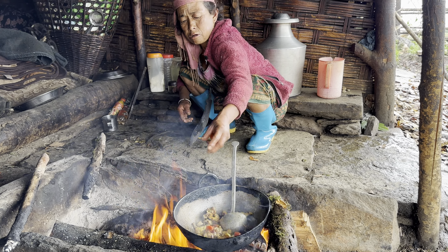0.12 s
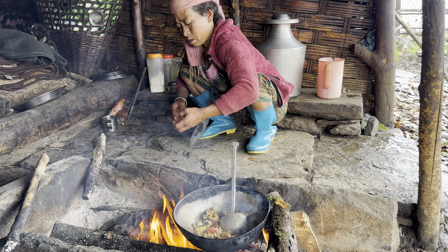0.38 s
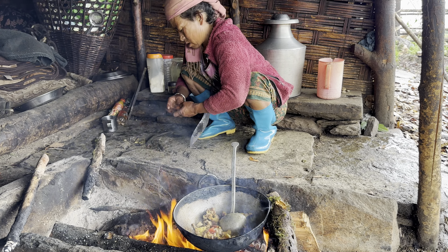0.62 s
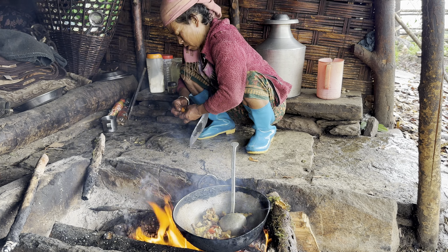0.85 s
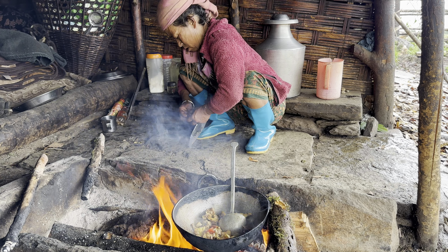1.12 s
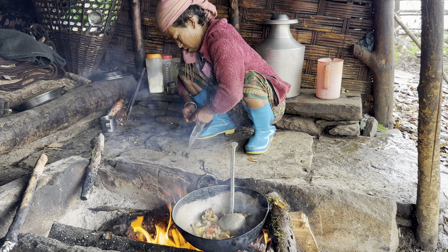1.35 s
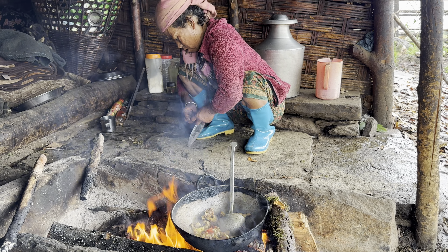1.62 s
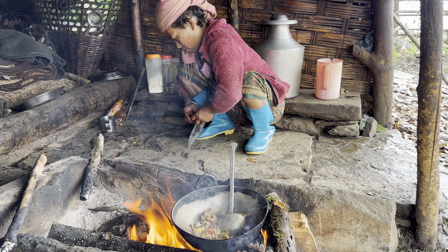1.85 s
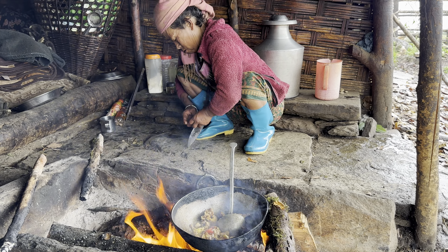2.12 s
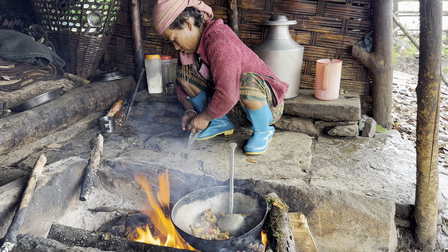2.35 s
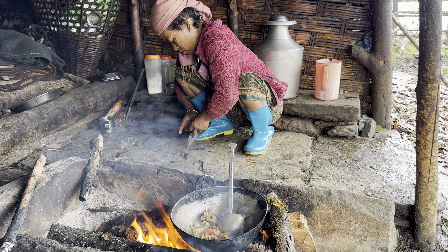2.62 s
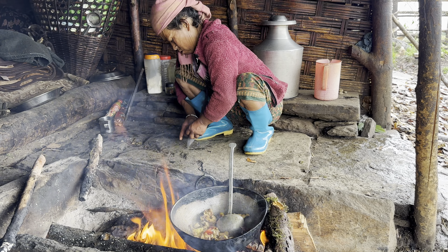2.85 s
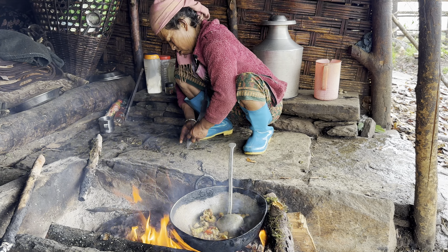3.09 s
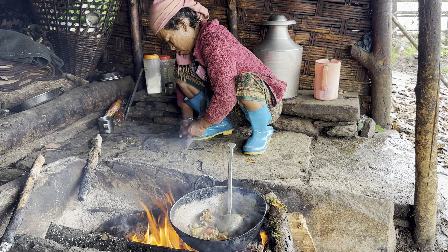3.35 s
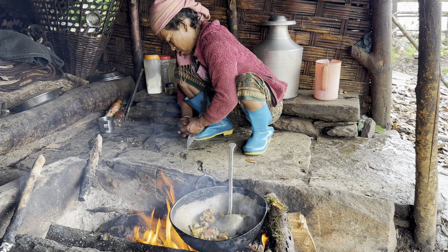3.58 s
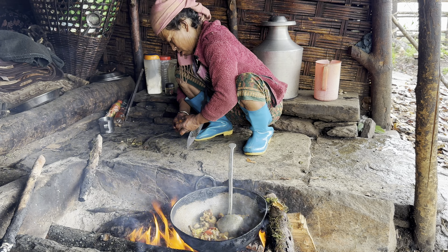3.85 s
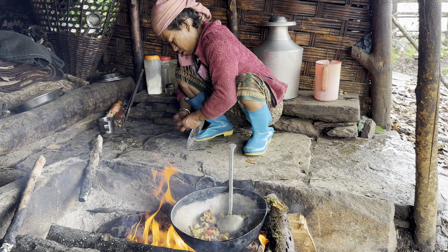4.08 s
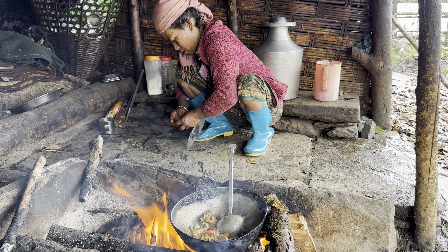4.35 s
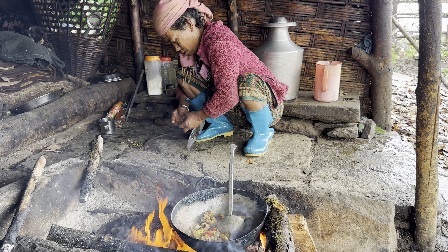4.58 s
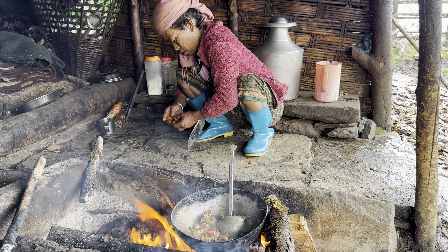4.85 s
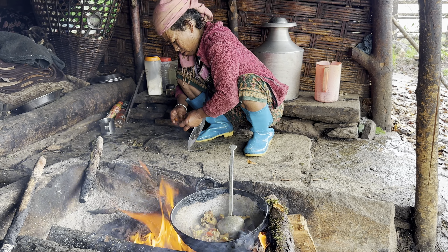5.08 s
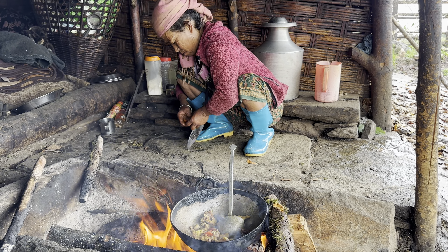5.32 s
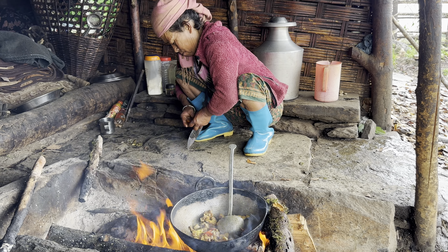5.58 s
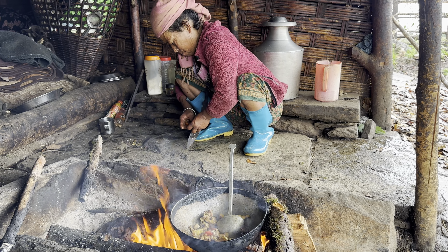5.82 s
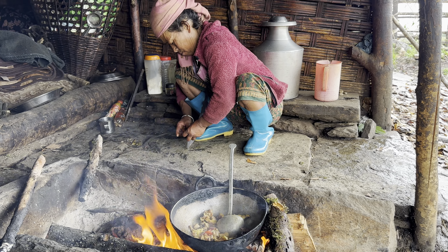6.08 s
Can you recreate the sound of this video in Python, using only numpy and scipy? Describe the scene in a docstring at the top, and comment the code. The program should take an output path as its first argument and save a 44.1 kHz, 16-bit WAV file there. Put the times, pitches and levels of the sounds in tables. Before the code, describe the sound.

Throughout about 6.2 seconds, meat sizzles close by in a metal pan over a wood fire: a dense, bright, finely flickering hiss with a slight metallic colour. Small fat spits tick at 0.1, 0.3, 0.6 and 0.9 seconds; a sharp snap of fat and wood comes at 1.07. Chicks in the yard start short falling peeps at 1.35 and continue, often in pairs, until about 6.1. The hen gives a soft rough cluck at 2.0, as the low flame flutter grows. Wood cracks at 2.15, then loudest, with a hollow knock, at 2.6, trailing small crackles to 3.1. Frying is stronger from 2.9 to 3.7, with many spits, notably at 3.5. More clucks come at 3.3, 4.1, 4.55, 4.9, 5.2, 5.6 and 6.0. Faint low wind puffs touch the microphone around 2.2 and 3.6. The open shelter adds only brief dull reflections.

```python
"""Frying over a wood fire

Meat fries in a metal pan over a wood fire under an open shelter. Sizzling fat is made of random tiny
clicks shaped by the pan, spitting drops are short rings, and each wood pop sets a row of tones ringing.
In the yard a hen clucks (rough pulses through mouth resonances) and her chicks peep (falling whistles).
Puffs of wind, made of low noise, touch the two microphone ports."""
import sys
import numpy as np
from scipy import signal
from scipy.fft import rfft, irfft
from scipy.io import wavfile
from scipy.ndimage import uniform_filter1d, map_coordinates

SR = 44100
rng = np.random.default_rng(int(sys.argv[2]) if len(sys.argv) > 2 else 0)


def store_wav(level_fs):
    """Save 16-bit WAV to argv[1]."""
    pcm = np.round(np.clip(np.atleast_2d(level_fs), -1, 1) * 32767)
    wavfile.write(sys.argv[1], SR, pcm.T.astype(np.int16))


def invert_db(x):
    """Field ratio 10**(x/20) for x, a level in decibels (scalar or array-like)."""
    u = np.asarray(x, float) / 20
    return 10 ** u


N = 273411  # length of the scene in samples


def slow_chance(rate):
    """Smoothly wandering noise of spread near 1, with a new random knot rate times a second."""
    knots = rng.standard_normal(int(N / SR * rate) + 3)
    return map_coordinates(knots, [np.arange(N) / SR * rate], order=3)


def in_time(rows):
    """Columns of a table joined by straight lines, one value a sample."""
    s, *columns = np.transpose(rows)
    return [np.interp(np.arange(N) / SR, s, c) for c in columns]


def in_pitch(rows, hz):
    """Columns of a table joined on a log-frequency axis."""
    at, *columns = np.transpose(rows)
    return [np.interp(np.log(hz + 1), np.log(at), c) for c in columns]


def at_ports(x, left_db, right_db, lead):
    """One spectrum as each port receives it; the left leads the right by lead radians."""
    return np.array([x * invert_db(left_db) * np.exp(.5j * lead), x * invert_db(right_db) * np.exp(-.5j * lead)])


def peak_db_at(t, rise, fall, crown_s):
    """A rounded peak of 0 dB at t = 0, rising and falling in dB per second."""
    return -np.where(t < 0, rise, fall) * (np.hypot(t, crown_s) - abs(crown_s))


def resonance(x, hz, width_hz):
    """A hollow space favours one band of sound, with gain 1 at its top."""
    r = np.exp(-np.pi * width_hz / SR)
    top = np.array([1, 0, -1]) * (1 - r * r) / 2
    return signal.lfilter(top, [1, -2 * r * np.cos(2 * np.pi * hz / SR), r * r], x)


def ring(clicks, hz, t60):
    """A unit click sets a sine of height 1 ringing; it falls by 60 dB in t60 seconds."""
    r, w = invert_db(-60 / (t60 * SR)), 2 * np.pi * hz / SR
    return signal.lfilter([0, np.sin(w)], [1, -2 * r * np.cos(w), r * r], clicks + 1e-18)


# puffs of wind, before the lumps: peak t/s, peak level/dB
WIND_PUFFS = [(0.62, -66), (1.075, -67), (1.42, -66), (2.21, -48), (2.3, -50), (2.43, -57), (2.5, -58),
              (2.64, -55), (3.26, -62), (3.59, -51), (3.65, -60), (3.75, -67), (4.14, -64), (4.38, -69),
              (4.58, -73), (4.85, -74), (5.82, -72), (5.97, -70)]


def wind(lumpy_db, own_share, lead):
    """Lumpy low turbulence, mostly common to both ports: a wavering breeze and separate puffs."""
    common, left, right = rng.standard_normal((3, N))
    raw = irfft(at_ports(rfft(common), .7, -.7, lead), N) + own_share * np.array([left, right])
    low = signal.sosfilt(signal.butter(2, [45, 130], "band", fs=SR, output="sos"), raw)
    t = np.arange(N) / SR
    breeze_db, breeze_swing_db = -84.5, 1
    rise_db_per_s, fall_db_per_s = 384, 350
    strength = invert_db(breeze_db + breeze_swing_db * slow_chance(12.0))
    for s, db in WIND_PUFFS:
        strength += invert_db(db + peak_db_at(t - s, rise_db_per_s, fall_db_per_s, crown_s=0.0036))
    lumps = invert_db(lumpy_db * slow_chance(30.04))
    return strength * lumps * low / low.std()


# chicks' calls, level at the right port before wavering and bounce:
# t/s, length/s, start f/Hz, end f/Hz, peak level/dB
CHICK_PEEPS = [(1.346, 0.038, 3500, 2500, -30), (1.452, 0.03, 3260, 2570, -31),
               (1.667, 0.049, 4400, 2400, -30), (1.796, 0.044, 3460, 2400, -32.5),
               (2.417, 0.045, 3400, 2330, -33), (2.762, 0.029, 4000, 2750, -34),
               (2.805, .053, 3470, 2360, -31), (3.145, 0.046, 3850, 2460, -32.5),
               (3.188, 0.049, 3340, 2400, -30.5), (3.6, 0.035, 3450, 2470, -35),
               (3.69, 0.069, 3580, 2250, -35.5), (4.021, 0.065, 3310, 2400, -30),
               (4.083, .037, 3650, 2620, -34), (4.432, 0.043, 3950, 2600, -31),
               (4.482, 0.066, 3460, 2250, -32.5), (4.862, 0.067, 4410, 2450, -34),
               (4.966, 0.069, 3440, 2250, -38), (5.087, 0.044, 4400, 3500, -36.5),
               (5.265, 0.023, 4100, 3600, -35), (5.517, 0.034, 3950, 3020, -34),
               (6.138, 0.046, 4050, 2790, -35)]


def chicks(lag_s):
    """Falling whistles that swell and break off, a little earlier on the left, wavering in strength."""
    out = np.zeros((2, N))
    drop_hz_per_s = 62000  # the slope at the end, or steeper if a straight fall is steeper
    left_over_right_db = -5
    for s, length, start_hz, end_hz, peak_db in CHICK_PEEPS:
        fall_hz = start_hz - end_hz
        late = max(1, drop_hz_per_s * length / fall_hz)  # long calls linger high first
        u = np.linspace(0, 1, round(length * SR))
        pitch = start_hz - fall_hz * u ** late
        swell = signal.windows.tukey(len(u), .2) * (.3 + .7 * u ** 1.5)
        cycles = np.cumsum(pitch) / SR - np.outer([lag_s, 0], pitch)
        level = invert_db(peak_db + np.array([[left_over_right_db], [0]]))
        out[:, round(s * SR):][:, :len(u)] += level * swell * np.sin(2 * np.pi * cycles)
    out *= invert_db(3.5 * slow_chance(150))
    # a strong bounce off the hard ground breaks each glide into strokes
    left_bounce = np.roll(out[0], round(0.001602 * SR))
    right_bounce = np.roll(out[1], round(.0011 * SR))
    return out + invert_db(-8.5) * np.array([left_bounce, right_bounce])


# clucks, before the two ports: peak t/s, peak level/dB, time from soft first catch to peak/s,
# f/Hz at full effort, beak opening at the peak as level/dB of the open over the shut resonance
HEN_CLUCKS = [(1.978, -33.5, 0.038, 428.7, 8), (3.264, -33.5, .038, 295.2, 5), (4.123, -33.5, .028, 446, 5),
              (4.554, -31.5, 0.042, 436.7, 6), (4.879, -31, 0.043, 429, 12), (5.214, -31.5, .04, 434, 17),
              (5.575, -35, 0.037, 446, 6.5), (5.986, -37.5, .024, 300, -14), (6.007, -36.5, .02, 436, -3)]
# the hen, off to one side, reaches the ports nearly in opposition:
# f/Hz, left level/dB, right level/dB, left lead/rad
HEN_AT_PORTS = [(179, 0, -2, 1.2), (300, 4, -7, 1.3), (415, 2.5, -0.5, 2.94), (570, 5.5, -1.5, 0.97),
                (850, 4.5, -0.5, 2.47), (1010, 2, -1, 2.8), (1480, -7.5, -8, 2.6)]


def hen(jitter, uneven_db, rasp, width_hz):
    """Uneven pulses with a rasp of air in every cycle; the beak trades one mouth resonance for another."""
    out, wobble = np.zeros(N), slow_chance(150)
    air, sizes = rng.standard_normal(N), invert_db(uneven_db * rng.standard_normal(N))
    catch_db, catch_s, catch_open_db = -8.5, .012, 3  # soft first catch: below the peak, spread, beak
    swell_db_per_s, fade_db_per_s, crown_s = 649, 518.5, .005  # main stroke: rise, fall, rounded top
    reach = round(.1 * SR)
    t = np.arange(-reach, reach) / SR
    for s, peak_db, lead_s, pitch_hz, beak_db in HEN_CLUCKS:
        span = slice(round(s * SR) - reach, round(s * SR) + reach)
        stroke = invert_db(peak_db_at(t, swell_db_per_s, fade_db_per_s, crown_s))
        effort = stroke + invert_db(catch_db) * np.exp(-.5 * ((t + lead_s) / catch_s) ** 2)
        # pitch sags by about a quarter for each dB of less effort
        effort_db = 20 * np.log10(np.maximum(effort, .05))
        pitch = pitch_hz * np.exp(0.25 * effort_db)
        open_db = catch_open_db + (beak_db - catch_open_db) * stroke
        rough = 1 - .75 * stroke  # the voice clears towards the peak
        cycles = np.cumsum(pitch * (1 + jitter * rough * wobble[span])) / SR
        phase = cycles % 1
        starts = np.diff(phase, prepend=0) < 0
        weaker = invert_db(-5 * (cycles // 1 % 2))  # every second pulse is 5 dB weaker
        pulses = starts * sizes[span] ** rough * weaker
        pulses += rasp * rough * air[span] * np.exp(-3 * phase) / 10
        throat = 0.63 * resonance(pulses, 418, 168)
        shut = invert_db(-open_db / 2) * resonance(pulses, 602, width_hz)
        opened = invert_db(open_db / 2) * resonance(pulses, 885, width_hz)
        top = 0.53 * resonance(pulses, 1320, 290)
        voice = throat - shut + opened - top
        even = np.sqrt(uniform_filter1d(voice ** 2, 600) + 1e-9)  # effort, not chance, sets the loudness
        out[span] += invert_db(peak_db) * effort * voice / even
    hz = np.fft.rfftfreq(N, 1 / SR)
    return irfft(at_ports(rfft(out), *in_pitch(HEN_AT_PORTS, hz)), N)


# wood popping, strength before each tone's own level and chance:
# t/s, hollow body under 700 Hz level/dB, crack level/dB, snap over 2.5 kHz level/dB
WOOD_POPS = [(0.262, -66, -44, -33.5), (0.8925, -63, -36.5, -33), (1.039, -63, -47, -33),
             (1.0667, -46, -34, -31), (1.0709, -47, -34, -28), (2.1544, -36.5, -32, -47),
             (2.5982, -25, -24.5, -30.5), (2.6055, -41, -24, -40), (2.6107, -42, -33, -42),
             (2.6135, -52, -34, -42), (2.678, -43, -44, -47), (2.807, -48, -42, -44),
             (2.833, -46, -35, -40), (3.065, -58, -38, -34), (3.66, -36, -35.5, -40),
             (4.124, -45, -37, -35), (5.934, -54, -52, -37)]
# tones of the wood: f/Hz, level/dB added to the strength of the pop, time to fall by 60 dB/s
WOOD_TONES = [(144, -16, 0.039), (458, 2, 0.033), (625, -2.5, 0.024), (814, -4, 0.023), (1290, -4.5, 0.017),
              (1755, -6, 0.039), (2210, -2.5, 0.019), (2950, -2.5, 0.027), (3500, -3, 0.009),
              (4050, 3.5, 0.011)]


def fire(rustle_db, rustle_t60):
    """Each pop strikes every tone of the wood with a strength of its own at each port."""
    s, *strength_db = np.transpose(WOOD_POPS)
    at = (s * SR).astype(int)
    chance_db = rng.normal(0, 1.8, (len(s), 2 * len(WOOD_TONES)))
    out = np.zeros((2, N))
    for k, (hz, level_db, t60) in enumerate(WOOD_TONES):
        part = np.searchsorted([700, 2500], hz)  # body, crack or snap
        for side in (0, 1):
            clicks = np.zeros(N)
            clicks[at] = invert_db(strength_db[part] + level_db + chance_db[:, 2 * k + side])
            out[side] += ring(clicks, hz, t60) * (-1) ** k
    # splinters tear on after the crack: a rustle that dies away
    strikes = np.zeros(N)
    strikes[at] = invert_db(strength_db[1] + rustle_db)
    dying = signal.lfilter([1], [1, -invert_db(-60 / (rustle_t60 * SR))], strikes + 1e-18)
    band = signal.butter(1, [900, 3500], "band", fs=SR, output="sos")
    return out + signal.sosfilt(band, dying * rng.standard_normal((2, N)))


def shelter(x):
    """Wall and ground send back a few dull echoes; each port hears those of the other port's sound."""
    dull = signal.lfilter([.5], [1, -.5], x)
    echoes = [(.0047, -15.5), (.0104, -17.5), (.0168, -24)]  # t/s, level/dB
    return x + sum(invert_db(db) * np.roll(dull[::-1], round(s * SR), axis=1) for s, db in echoes)


def fat_bubbles(per_s, spread_db):
    """Tiny steam bubbles burst at random, many small and a few large; rms 1."""
    sizes = invert_db(spread_db * np.minimum(rng.exponential(1, N), 5)) * rng.standard_normal(N)
    bursts = sizes * (rng.random(N) < per_s / SR)
    return bursts / bursts.std()


# drops of fat bursting: t/s, level/dB at the burst (ring and spatter scale with it), ring f/Hz
FAT_SPITS = [(0.106, -19, 15000), (0.3424, -20, 15000), (0.5587, -17, 14300), (0.8744, -29, 15200),
             (0.903, -20, 14700), (1.0666, -9.5, 9600), (1.071, -12.5, 6800), (1.0964, -21, 14600),
             (1.4745, -17, 6340), (1.557, -24, 14200), (1.8964, -19, 13900), (2.5114, -27, 15000),
             (2.882, -23, 6570), (2.978, -22, 14500), (3.0674, -20, 15200), (3.164, -24, 6420),
             (3.2314, -20, 14200), (3.2508, -16, 8270), (3.3405, -17, 8160), (3.4983, -17, 13200),
             (3.5206, -12, 14200), (3.631, -23, 6440), (3.739, -17, 9280), (3.9594, -16, 15100),
             (4.2924, -21, 15100), (4.4705, -19, 6550), (5.043, -22, 5960), (5.155, -23, 6560),
             (5.4017, -21, 7070), (5.678, -21, 14200)]


def spits(t60, tail_db):
    """Each drop bursts as a short ring with a spatter of noise behind it."""
    out, t = np.zeros(N), np.arange(round(0.015 * SR)) / SR
    noise = rng.standard_normal((len(FAT_SPITS), len(t)))
    for (s, peak_db, hz), grains in zip(FAT_SPITS, noise):
        tone = np.sin(2 * np.pi * hz * t) * invert_db(-60 * t / t60)
        spatter = invert_db(tail_db) * np.diff(grains, prepend=0) * invert_db(-60 * t / 0.026)
        out[round(s * SR):][:len(t)] += invert_db(peak_db) * (tone + spatter)
    return out


# the sizzle at the two ports, before resonances and swells:
# f/Hz, left level/dB per Hz, right level/dB per Hz, likeness/0-1, left lead/rad
SIZZLE_AT_PORTS = [(40.4, -102, -102, 1, 1), (294, -94.5, -95.5, 0.94, 0.1), (371, -91, -91, 0.98, -0.4),
                   (465, -78, -81, 1, -1.2), (628, -85.5, -85, 0.86, 0.83), (915, -79, -83.5, 0.8, -0.04),
                   (1410, -81, -82.5, 0.52, 0.5), (2160, -81.5, -80, 0.55, 0.5),
                   (2170, -80.5, -74.5, 0.91, .5), (3170, -74.5, -75.5, 0.4, 1.73),
                   (3880, -75.5, -75, 0.59, 0.6), (5700, -74, -79, 0.02, 3), (6080, -71, -76.5, 0.37, 0.5),
                   (7160, -71.5, -79.5, 0.46, 0.84), (7600, -75.5, -77.5, 0.06, 3.5),
                   (7930, -75, -76.5, 0.75, 0.23), (11230, -77, -77, 1, -3), (12850, -80.5, -80.5, 1, -5),
                   (14600, -73.5, -73, 1, -6), (18200, -92, -103, 1, -22.5)]
# resonances of pan and hearth: f/Hz, width/Hz, lift level/dB
PAN_RESONANCES = [(577, 14, 4), (710, 31, 7.5), (864, 20, 3), (1153, 57, 8), (1295, 56, 7.5),
                  (1618, 55, 4.5), (1812, 105, 6.5), (2226, 98, 4.5)]
# how hard the fat fries (only the swing around the average counts): t/s, level/dB
FRYING = [(0.0, -37.5), (2.59, -38), (2.93, -36.5), (3.68, -36.5), (4.13, -38), (5.3, -38), (5.46, -38),
          (6.2, -38)]
# how far each pitch follows that swing: f/Hz, share of the swing
FRYING_SHARE = [(400, 0.23), (1500, 0.19), (4000, 0.76), (8000, 1.2), (14000, .9)]


def sizzle(shared_db, own_db):
    """Bubbles heard by both ports plus bubbles scattered to one port only, flickering band by band."""
    hz = np.fft.rfftfreq(N, 1 / SR)
    left_db, right_db, alike, lead = in_pitch(SIZZLE_AT_PORTS, hz)
    alike = np.clip(alike, 0, 1)
    lift_db = sum(db / (1 + (2 * (hz - at) / width) ** 2) for at, width, db in PAN_RESONANCES)
    both, left, right = [rfft(fat_bubbles(16000, spread_db=2.04)) for _ in range(3)]
    field = np.sqrt(alike) * at_ports(both, left_db, right_db, lead)
    field += np.sqrt(1 - alike) * np.array([left * invert_db(left_db), right * invert_db(right_db)])
    field *= np.sqrt(SR / 2) * invert_db(lift_db)  # from level per Hz to level of the whole band
    fry_db, = in_time(FRYING)
    # the flame flares up and its low flutter stays stronger
    flare_s, flare_rise_s, flare_db = 1.9, 0.065, 5
    flutter_full_hz, flutter_gone_hz = 352, 835
    flare = flare_db * .5 * np.tanh((np.arange(N) / SR - flare_s) / flare_rise_s)
    centres = np.geomspace(300, 15000, 12)
    together = slow_chance(25) + 0.38 * slow_chance(15)
    out = 0
    for k, centre in enumerate(centres):
        mask = np.interp(np.log(hz + 1), np.log(centres), np.arange(12) == k)
        swell_db = in_pitch(FRYING_SHARE, centre)[0] * (fry_db - fry_db.mean())
        swell_db += np.interp(centre, [flutter_full_hz, flutter_gone_hz], [1, 0]) * flare
        flicker_db = shared_db * together + own_db * slow_chance(18)
        out = out + invert_db(swell_db + flicker_db) * irfft(field * mask, N)
    drops = rfft(spits(0.0024, tail_db=-13.5))
    return out + irfft(at_ports(drops, 0, 0, lead), N)


def scene():
    """Pan and fire close by, poultry in the yard, wind at the ports."""
    breeze = wind(1.5, own_share=0.2, lead=0.82)
    poultry = chicks(lag_s=-0.000062) + hen(0.07, 3.2, rasp=0.64, width_hz=108)
    echoing = shelter(poultry + fire(-0.82, rustle_t60=0.067))
    return breeze + echoing + sizzle(0.58, 0.96)


def roll_off(x):
    """The treble ends steeply here."""
    return signal.sosfilt(signal.butter(12, 16050, fs=SR, output="sos"), x)


def record(dry):
    """The microphone cuts the deepest bass, below about 52 Hz."""
    heard = signal.sosfilt(signal.butter(3, 52, "high", fs=SR, output="sos"), dry)
    return roll_off(heard)


dry = scene()
out = record(dry)
store_wav(out)
```